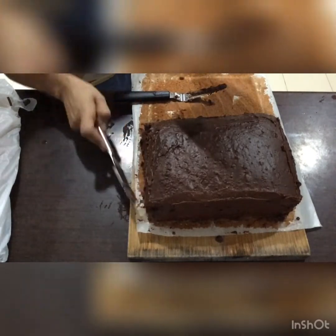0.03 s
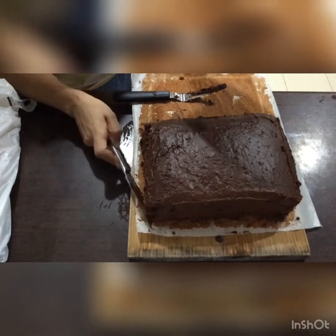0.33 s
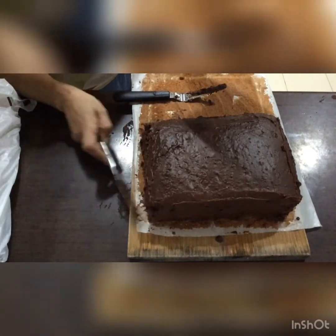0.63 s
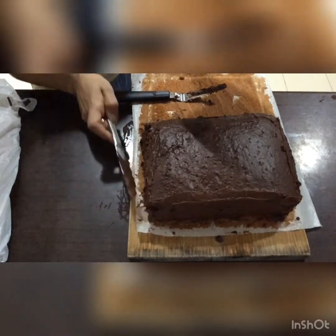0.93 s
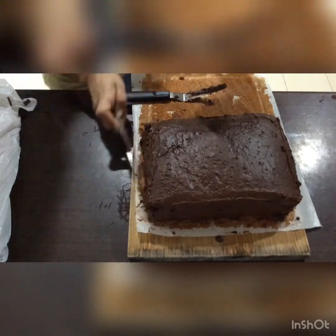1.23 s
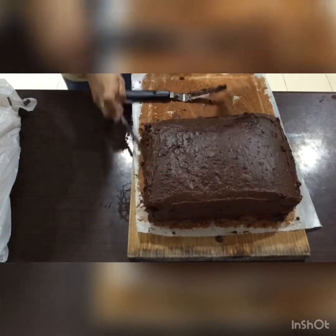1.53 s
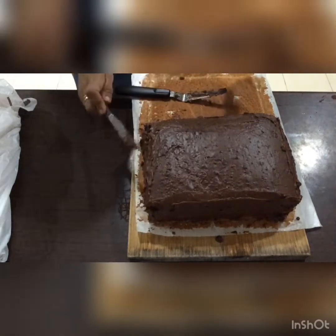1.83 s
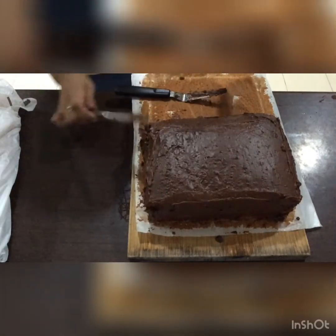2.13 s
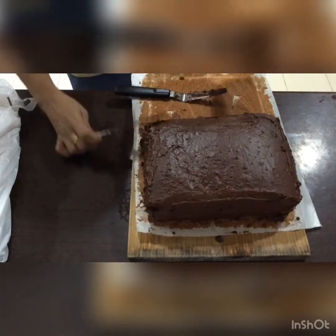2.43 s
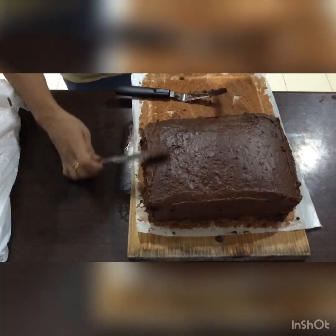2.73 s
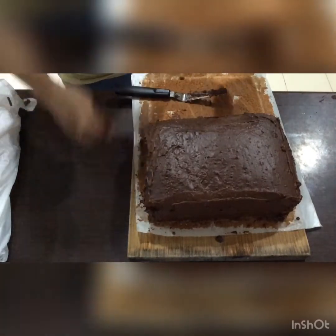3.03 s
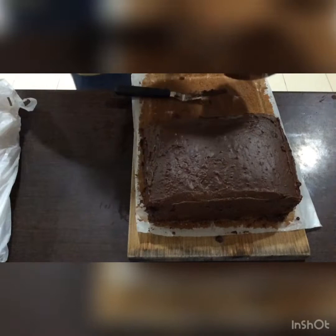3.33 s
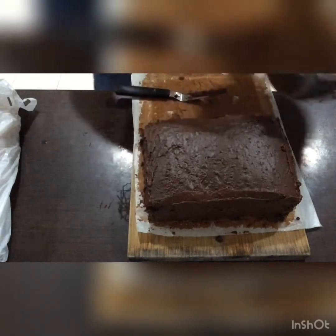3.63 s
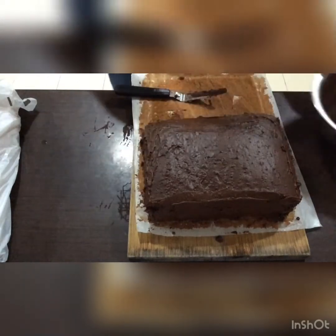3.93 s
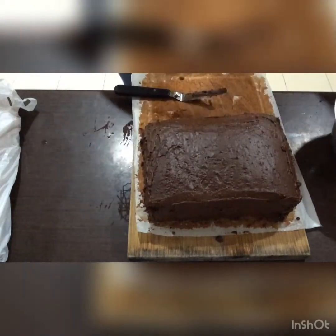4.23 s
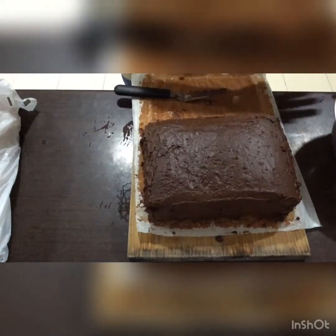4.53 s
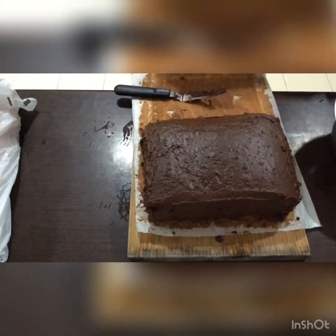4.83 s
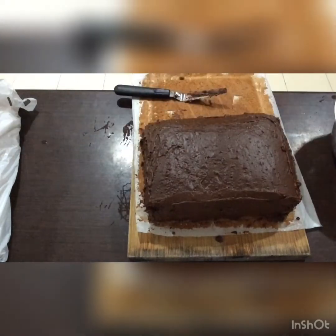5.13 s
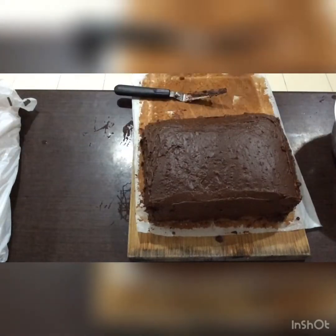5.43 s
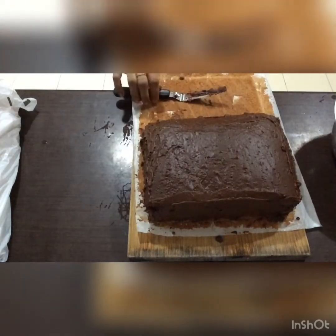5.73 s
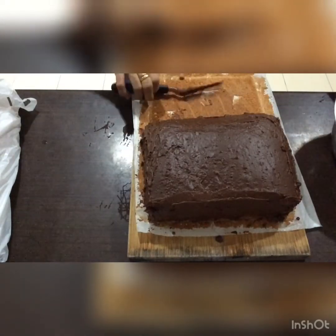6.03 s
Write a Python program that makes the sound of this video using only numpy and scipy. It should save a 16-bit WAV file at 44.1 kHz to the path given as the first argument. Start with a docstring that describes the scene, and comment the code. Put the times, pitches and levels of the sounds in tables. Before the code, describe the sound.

A fan hums quietly and steadily throughout in a small, hard kitchen that gives each blow a short echo. At about 1.6 seconds a palette knife makes a faint scrape on paper, with a tiny squeak and chink. At 2.5 seconds comes one dull, distinct knock on a wooden board, followed by soft scrapes and squeaks until about 2.9. At 3.5 seconds the knife drops into a steel bowl with a loud, bright clatter, bouncing and ringing in quick, weakening hits over a low thump. Near 4 seconds the bowl thuds onto the counter with another loud rattle, then rocks to rest with small clinks by 4.4. From 4.8 seconds a spatula is picked up with faint rubs and light ticks, with one sharper click at about 5.75 and a last soft tick just after 6 seconds.

```python
"""A fan hums in a small, hard kitchen that echoes every blow. From 1.6 s a palette knife scrapes and
squeaks along a cake in tiny slips over paper; at 2.5 s something knocks on the wooden board.
At 3.5 s the knife drops into a steel bowl and bounces, ringing blade and wall. Near 4 s the bowl
thuds onto the counter and rocks to rest. From 4.8 s a hand picks up a second spatula with light
ticks and rubs."""
import sys
import numpy as np
from scipy import signal
from scipy.fft import rfft, irfft, next_fast_len
from scipy.io import wavfile
from scipy.ndimage import map_coordinates

SR = 44100
rng = np.random.default_rng(int(sys.argv[2]) if len(sys.argv) > 2 else 0)


def waveform_to_disk(signal):
    """Save audio, clipped to [-1, 1], as 16-bit WAV at the path in sys.argv[1]."""
    frames = np.transpose(np.atleast_2d(signal))
    scaled = np.clip(frames, -1, 1) * 32767
    samples = np.round(scaled).astype(np.int16)
    wavfile.write(sys.argv[1], SR, samples)


N = 267687
TIME_S = np.arange(N) / SR
AGE_S = TIME_S[:32768]  # time since an event's onset


def undb(db):
    """Decibels to gain."""
    return 10 ** (np.asarray(db) / 20)


def set_rms(x, db):
    """Scale to an overall rms level."""
    return x * undb(db) / np.sqrt(np.mean(x ** 2))


def set_attack(x, db):
    """Scale a blow by the rms of its first 10 ms."""
    return x * undb(db) / np.sqrt(np.mean(x[:SR // 100] ** 2))


def decay(t60_s):
    """Free exponential decay."""
    return np.exp(-np.log(1000) * AGE_S / t60_s)


def swell(length_s):
    """Half-sine envelope."""
    return np.sin(np.pi * np.minimum(AGE_S / length_s, 1))


def curve_at(hz, points):
    """Interpolate (f/Hz, value) points over log frequency."""
    points_hz, values = np.transpose(points)
    return np.interp(np.log(np.maximum(hz, 1)), np.log(points_hz), values)


def colour(x, points):
    """Minimum-phase filter through (f/Hz, gain/dB) points."""
    size = 2 * next_fast_len(len(x) // 2 + 2048)
    bins_hz = np.arange(size // 2 + 1) * SR / size
    cepstrum = irfft(np.log(undb(curve_at(bins_hz, points))))
    cepstrum[1:size // 2] *= 2
    cepstrum[size // 2 + 1:] = 0
    return irfft(rfft(x, size) * np.exp(rfft(cepstrum)))[:len(x)]


def narrow_noise(hz, width_hz):
    """Noise in one resonance, rms 1."""
    bins_hz = np.arange(N // 2 + 1) * SR / N
    gain = 1 / (1 + 2 * ((bins_hz - hz) / width_hz) ** 2)
    phase = 2 * np.pi * rng.random(len(bins_hz))
    return set_rms(irfft(gain * np.exp(1j * phase), N), 0)


def add(track, t_s, x):
    """Mix x into the track at t_s."""
    start = int(t_s * SR)
    track[start:start + len(x)] += x[:N - start]


def modes(table):
    """One damped cosine per row: a surface radiates by acceleration, so each starts at its crest."""
    shapes = [undb(db) * decay(t60_s) * np.cos(2 * np.pi * hz * AGE_S) for hz, db, t60_s in table]
    return np.array(shapes) * (1 - np.exp(-AGE_S / 0.000094))


def strike(shapes, scatter_db=2.5):
    """Modes hit at a random spot: each gets its own size and sign."""
    sizes = undb(scatter_db * rng.standard_normal(len(shapes)))
    signs = rng.choice([-1, 1], len(shapes))
    return (sizes * signs) @ shapes


def burst(spectrum, t60_s, rise_s=1 / SR):
    """Dense modes as coloured noise that builds and decays."""
    noise = rng.choice([-1., 1.], len(AGE_S))
    rise = 1 - np.exp(-AGE_S / rise_s)
    return set_attack(colour(noise * decay(t60_s) * rise, spectrum), 0)


# Moving air spectrum: f/Hz, relative density/dB
AIR_SPECTRUM = [(20, -28), (45, -11.5), (108, -1.5), (217, -8), (430, -16.5), (910, -20), (1330, -24.5),
                (2550, -33), (3600, -37.5), (5200, -42.5), (7000, -44.5), (8200, -43), (10500, -47),
                (16000, -51.5)]
# Fan drone bands: f/Hz, width/Hz, level/dB
FAN_BANDS = [(40.77, 7.2, -59.5), (79, 7.4, -67.5), (98.6, 3.8, -55), (124, 8, -57.5), (171.5, 7.4, -60.5),
             (215, 22, -59), (308, 33, -58.5), (577.4, 84, -67), (790, 63, -65.5), (904.5, 62, -62.5),
             (1530, 110, -69.5)]


def fan_and_air():
    """Broad rush of air under the fan's wavering drone."""
    air = set_rms(colour(rng.standard_normal(N), AIR_SPECTRUM), -48.5)
    drone = sum(undb(db) * narrow_noise(hz, width_hz) for hz, width_hz, db in FAN_BANDS)
    return air + drone


def whine(hz=12775, hold_s=1.8, fade_db_per_s=7.5):
    """Thin electric tone that holds, then dies away."""
    tone = set_rms(np.sin(2 * np.pi * hz * TIME_S), -91)
    return tone * undb(-fade_db_per_s * np.maximum(TIME_S - hold_s, 0))


# Kitchen reverberation: f/Hz, t60/s
ROOM_DECAY = [(150, 0.29), (700, 0.35), (2000, 0.35), (8000, 0.4), (15000, 0.17)]


def room_echo(x, build_s=0.0021):
    """Diffuse echo that builds quickly and dies band by band."""
    centres_hz = np.geomspace(60, 16000, num=9)
    noise = rfft(rng.standard_normal(len(AGE_S)))
    bins_hz = np.arange(len(noise)) * SR / len(AGE_S)
    tail = np.zeros(len(AGE_S))
    for hz, weights in zip(centres_hz, np.eye(len(centres_hz))):
        band = irfft(noise * curve_at(bins_hz, np.c_[centres_hz, weights]))
        tail += band * decay(curve_at(hz, ROOM_DECAY))
    tail *= 1 - np.exp(-(AGE_S / build_s) ** 2)
    tail /= np.sqrt(np.sum(tail ** 2))
    tail = colour(tail, [(120, -4), (500, -2.5), (1000, -2), (2500, -3), (5000, -4), (15000, 0)])
    return undb(-3.5) * signal.fftconvolve(x, tail)[:N]


# Paper friction spectrum: f/Hz, gain/dB
PAPER_SPECTRUM = [(600, 2.5), (1800, 3), (3500, -4), (4800, -4), (9000, -5.5), (13500, -9), (16000, -18)]
# Blade and finger strokes: t/s, length/s, level/dB, brightness/dB, edge resonance/dB
STROKES = [(1.581, 0.092, -58.5, 3.5, -8), (2.657, 0.12, -55.5, -15, -21), (2.772, 0.1, -61, -4.5, -24),
           (4.761, 0.096, -62.5, -11.5, -24), (5.079, 0.37, -68.5, 3.5, -25), (5.621, 0.22, -63, -5, -7),
           (5.85, 0.058, -61, -5.5, -21.5)]


def paper_scrapes(edge_hz=3240, edge_width_hz=490):
    """Swells of tiny uneven slips over paper, singing faintly in the blade's edge."""
    out = np.zeros(N)
    edge = signal.iirpeak(edge_hz, edge_hz / edge_width_hz, fs=SR)
    for t_s, length_s, db, bright_db, edge_db in STROKES:
        slips = rng.standard_normal(len(AGE_S))
        slips *= undb(2.2 * np.minimum(rng.exponential(size=len(AGE_S)), 5))
        paper = set_rms(colour(slips, PAPER_SPECTRUM), 0)
        singing = set_rms(signal.lfilter(*edge, slips), edge_db)
        grit = colour(paper + singing, [(3000, 0), (8000, bright_db)])
        add(out, t_s, set_rms(grit, db) * swell(length_s))
    return out


# Rubbing squeaks: t/s, length/s, start f/Hz, glide/(Hz/s), level/dB
RUBS = [(1.586, 0.038, 2960, 20000, -57), (2.648, 0.15, 1013, 102, -48.5), (2.786, 0.053, 650, -2200, -52)]


def squeaks():
    """Stick-slip, uneven in timing and size; pitch follows the rubbing speed."""
    out = np.zeros(N)
    waver = 1 + 0.058 * narrow_noise(0, 200)[:len(AGE_S)]
    grip = 1 + 0.8 * narrow_noise(0, 90)[:len(AGE_S)]
    for t_s, length_s, start_hz, glide_hz_per_s, db in RUBS:
        pitch_hz = (start_hz + glide_hz_per_s * np.minimum(AGE_S, length_s)) * waver
        tone = grip * np.sin(2 * np.pi * np.cumsum(pitch_hz) / SR)
        add(out, t_s, set_rms(tone, db) * swell(length_s))
    return out


# Blade tip modes: f/Hz, level/dB, t60/s
TIP_MODES = [(1890, 3, .03), (2100, -1, .02), (2680, 1, .03), (3330, -5, 0.1), (3591, -4, .04),
             (8400, -6, .02)]


def tip_chink(t_s=1.641, db=-54):
    """The blade's tip springs off the paper and rings."""
    out = np.zeros(N)
    add(out, t_s, set_attack(modes(TIP_MODES).sum(0), db))
    return out


# Light touch spectrum: f/Hz, gain/dB
TICK_SPECTRUM = [(200, -6), (700, 14), (1500, 1), (2100, 8), (3000, -1), (6500, -10), (8500, -14),
                 (10300, -6), (11500, -13), (16000, -20)]
# Knife and handle touches: t/s, level/dB, woody body/dB
TOUCHES = [(3.0055, -58, -17), (4.889, -57, 4), (5.348, -60, -9), (5.738, -52.5, 5), (5.7530, -40, 4.5),
           (6.061, -54, -9)]


def handling_ticks():
    """Soft touches build gently and die fast."""
    out = np.zeros(N)
    for t_s, db, body_db in TOUCHES:
        tick = burst(TICK_SPECTRUM, t60_s=0.017, rise_s=0.0016)
        add(out, t_s, set_attack(colour(tick, [(900, body_db), (1500, 0)]), db))
    return out


# Wooden board modes: f/Hz, level/dB, t60/s
WOOD_MODES = [(133, -8.5, 0.061), (248, 1, 0.063), (298, 1, 0.093), (340, -2.5, 0.039), (565, 1, 0.054),
              (789, 1.5, 0.069), (880, 1, 0.032), (1050, -12, 0.032), (1180, -2, 0.044), (1570, -9, 0.027),
              (1766, -1, 0.028), (2020, 1.5, 0.022), (4080, -1.5, 0.012), (4380, 2, 0.0078)]
# Board chatter spectrum: f/Hz, gain/dB
CHATTER_SPECTRUM = [(47, -57), (80, -3), (271, -0.5), (441, -8.5), (785, -1.5), (1310, -7), (1900, -6.5),
                    (2220, -13), (2660, -10), (3390, -18.5), (4400, -19), (5170, -31), (6030, -25.5),
                    (13100, -39.5), (16000, -65)]


def board_knock(t_s=2.5167, db=-19.5):
    """One dull blow on the board, which chatters briefly on the counter."""
    out = np.zeros(N)
    signs = (-1) ** np.arange(len(WOOD_MODES))  # on the far side, adjacent modes swing opposite ways
    body = set_attack(signs @ modes(WOOD_MODES), 0)
    chatter = undb(-3) * burst(CHATTER_SPECTRUM, t60_s=0.097)
    add(out, t_s, set_attack(body + chatter, db))
    return out


# Counter top modes: f/Hz, level/dB, t60/s
COUNTER_TOP_MODES = [(98.5, -16, 0.17), (136.5, -4.5, 0.112), (159, -12, .12), (214.8, -3, 0.11),
                     (294, 1, 0.073), (320, 1, 0.025), (497, -7.5, 0.068)]
# Modes of the bowl's base on the counter: f/Hz, level/dB, t60/s
BOWL_BASE_MODES = [(586, 2, 0.06), (615, 5, .07), (692, 0, .055), (775, -2.5, 0.043), (855, -9.5, 0.098),
                   (930, -9, 0.055)]
# Contact versus landing strength: level/dB, contact/ms, base boom/dB
CONTACT_CURVE = [(-22, 4.3, -18), (-17.5, 0.71, -17.5), (-13, 1.29, 12.5)]
# Bowl landings: t/s, level/dB, low sag of the counter/dB
LANDINGS = [(3.4712, -13.5, -6), (3.9655, -15.5, 1), (3.973, -17, 1), (4.0860, -26.5, -11.5),
            (4.13, -23.5, -13.5), (4.141, -31, -11.5)]


def bowl_thuds():
    """The bowl lands and rocks: soft, long pushes reach only low modes; hard ones boom the base."""
    out = np.zeros(N)
    counter, base = modes(COUNTER_TOP_MODES).sum(0), modes(BOWL_BASE_MODES).sum(0)
    force_db, contact_ms, boom_db = np.transpose(CONTACT_CURVE)
    for t_s, db, sag_db in LANDINGS:
        push = swell(np.interp(db, force_db, contact_ms) / 1000)
        boom = undb(np.interp(db, force_db, boom_db)) * base
        thud = signal.fftconvolve(counter + boom, push)[:len(AGE_S)]
        add(out, t_s, set_attack(colour(thud, [(155, sag_db), (210, 0)]), db))
    return out


def base_pressure(t_s, flat_db=-10, ease_s=0.069):
    """Bowl's pressure on the counter, 0-1: set by each landing, full at flat_db, then easing."""
    loads = [undb(db - flat_db) ** 2 * np.exp(-((t_s - land_s) / ease_s) ** 2)
             for land_s, db, _ in LANDINGS if t_s > land_s - 0.005]
    return min(1, max(loads, default=0))


# Knife strikes on the bowl: t/s, level/dB, treble/dB, first flight/s, step per bounce/dB
KNIFE_STRIKES = [(3.4708, -15, 0, 0.0094, -19), (3.5578, -10.5, -0.5, .011, -15),
                 (3.5918, -16, -1, 0.016, -13), (3.6315, -23, -3, 0.01, -22), (3.6395, -24, 1, .012, -7),
                 (3.678, -26, -9, .01, -22), (3.6885, -31, 0.5, .009, -5), (3.7268, -27, -3.5, 0.0097, -22),
                 (3.7962, -33, -0.5, 0.02, -22), (3.813, -37.5, -4.5, .006, -8),
                 (3.86, -33.5, -6.5, .012, -21.5), (3.871, -37, -2, .011, -12),
                 (3.9657, -20, -7, .007, -10.5), (3.9770, -16, -2.5, .0113, -4),
                 (4.1415, -28.5, -4.5, .013, -22), (4.154, -33.5, -13, .008, -15),
                 (4.1872, -37, -4.5, .013, -22), (4.199, -33.5, -11, .012, -14),
                 (4.256, -41.5, -5.5, 0.014, -9), (4.3945, -41, -8, .012, -22),
                 (4.4003, -39.5, -6, .009, -11)]


def bounces(max_hits=6, flight_ratio=0.94, floor_db=-21):
    """Yield each strike and its ever sooner, weaker rebounds: t/s, level/dB, treble/dB."""
    for t_s, db, treble_db, flight_s, step_db in KNIFE_STRIKES:
        for k in range(max_hits):
            if k * step_db > floor_db:
                yield t_s, db + k * step_db, treble_db
            t_s += flight_s * flight_ratio ** k


# Long ring of knife and bowl: f/Hz, level/dB, t60/s
RING_MODES = [(577.2, 2.5, 0.22), (616, 0.5, 0.18), (705, 2, .2), (743, 3, 0.22), (830, 1, .2),
              (955, -2.5, .22), (1033, 4.5, 0.18), (1445, -4.5, .3), (1363, -7, 0.3), (1497, -7.5, .2),
              (1602, -6.5, 0.22), (1650, -7.5, 0.3), (1880, -9.5, 0.28), (1917, -4, .17), (1960, 0.5, 0.24),
              (2026, 6.5, 0.36), (2185, -6.5, 0.18), (2260, -10, 0.18), (2446, -1, 0.28), (3082, -8, .3),
              (5400, -16, .2), (5620, -16, .18), (6530, -16.5, .16), (6765, -12.5, .18), (6810, -14, .18),
              (6860, -14.5, .16), (7165, -14.5, .16), (7850, -14, .16), (8160, -13.5, .16),
              (8290, -15, .14), (8620, -13.5, .14), (8900, -13.5, 0.14)]
# Blade bending modes, choked against the bowl: f/Hz, level/dB, t60/s
BENDING_MODES = [(1396, 5, 0.022), (2035, 3, 0.046), (3250, -8, 0.023), (5560, -2, 0.024),
                 (6890, -0.5, 0.037), (6820, -2, 0.021), (7620, -4, 0.017), (8550, 1.5, 0.023),
                 (8330, -1.5, 0.022), (9020, -1.5, 0.028), (10350, -6.5, 0.022)]
# Spectrum of the dense steel modes: f/Hz, gain/dB
STEEL_SPECTRUM = [(120, -28), (300, -2.5), (430, -10), (650, 4.5), (850, 2), (1150, -3), (1450, 0),
                  (1750, -2.5), (2100, -2), (2650, -7), (3150, -5.5), (3900, -16.5), (5000, -15.5),
                  (5600, -7.5), (6100, -9.5), (7000, -4.5), (7500, -5), (8300, 2), (9000, -5), (9800, -10),
                  (13000, -17), (16000, -30.5)]
# Ring versus strike strength, light taps damping least: level/dB, ring/dB
RING_CURVE = [(-36, 4.5), (-32, 0.5), (-19, -4), (-13.5, 1)]


def knife_clatter(detune=0.023):
    """The knife bounces in the steel bowl; each contact point reweights the modes and detunes the blade."""
    out, bending = np.zeros(N), modes(BENDING_MODES)
    ring_shelf = [(3400, 0), (5500, -3.5)]
    ringing = modes([(hz, db + curve_at(hz, ring_shelf), t60_s) for hz, db, t60_s in RING_MODES])
    for t_s, db, treble_db in bounces():
        skid_s = np.interp(db, [-36, -20], [0.0012, 0.0003])  # light blows skid, hard ones bite at once
        bite = undb(-2) * burst(STEEL_SPECTRUM, t60_s=0.031, rise_s=skid_s)
        pitch_ratio = 1 + detune * rng.standard_normal()
        blade = set_attack(map_coordinates(strike(bending), [AGE_S * SR * pitch_ratio]), -7.5)
        # the thin wall spreads the blow into many weak, longer-lived modes
        shimmer = undb(-15.5) * burst(STEEL_SPECTRUM, t60_s=0.13, rise_s=0.003)
        ring = set_attack(strike(ringing), -11 + np.interp(db, *np.transpose(RING_CURVE)))
        # the counter chokes the ring and radiates the lows
        pressure = base_pressure(t_s)
        choke_db, bass_db = -9.5 * pressure, -1.5 + 11.5 * pressure
        blow = bite + blade + undb(choke_db) * (shimmer + ring)
        shelves = [(700, bass_db), (1000, 0), (3400, 0), (5500, treble_db)]
        add(out, t_s, undb(db) * colour(blow, shelves))
    return out


# Colour of the knock's echo, duller than its direct click: f/Hz, gain/dB
BOARD_ECHO_COLOUR = [(400, -4), (1500, 0.5), (3000, -2.5), (4200, -9.5)]


def scene():
    """Handling sounds and their echo over fan, air and whine; mono."""
    background = fan_and_air() + whine()
    board = board_knock()
    handling = bowl_thuds() + tip_chink() + handling_ticks()
    handling += paper_scrapes() + squeaks() + knife_clatter()
    echo = room_echo(handling + colour(board, BOARD_ECHO_COLOUR))
    return (background + board + handling + echo)[None]


def record(dry, low_hz=35, top_hz=16200):
    """High-pass, clip near full scale, low-pass."""
    highpass = signal.butter(6, low_hz, "high", fs=SR, output="sos")
    lowpass = signal.ellip(10, 0.2, 80, top_hz, fs=SR, output="sos")
    clipped = np.clip(signal.sosfilt(highpass, dry), -0.9, 0.9)
    return signal.sosfilt(lowpass, clipped)


dry = scene()
out = record(dry)
waveform_to_disk(out)
```